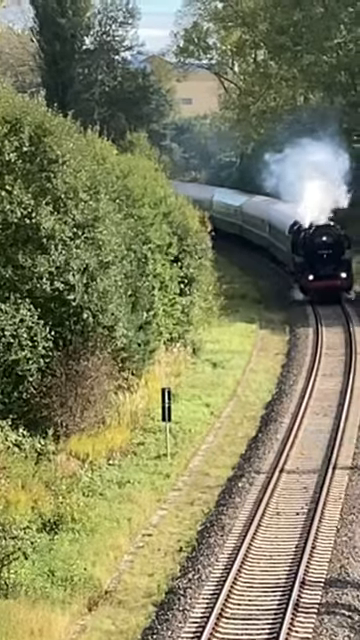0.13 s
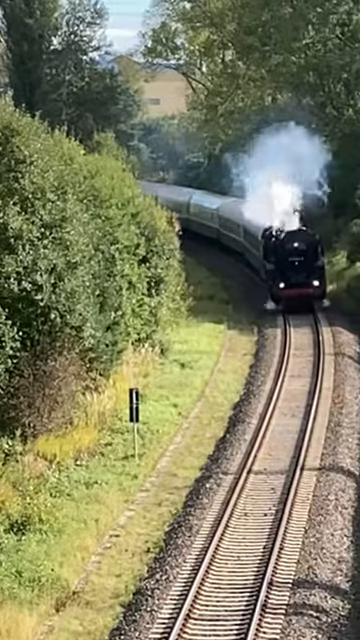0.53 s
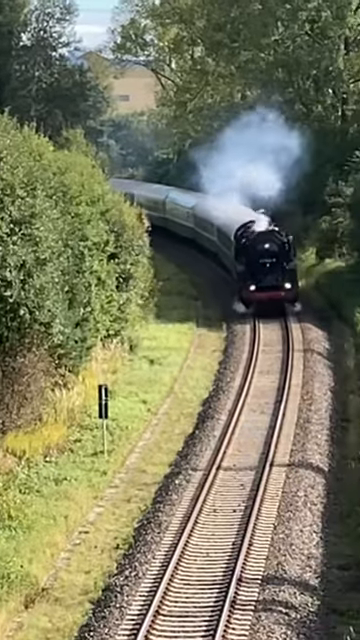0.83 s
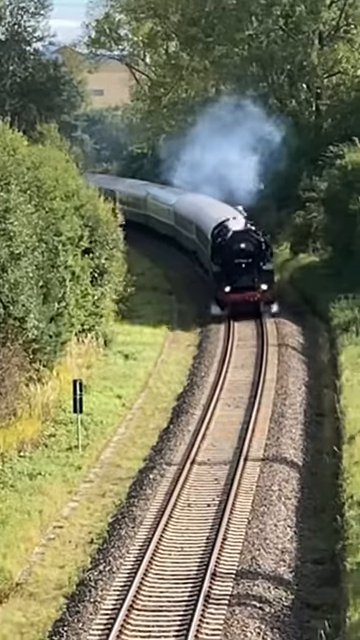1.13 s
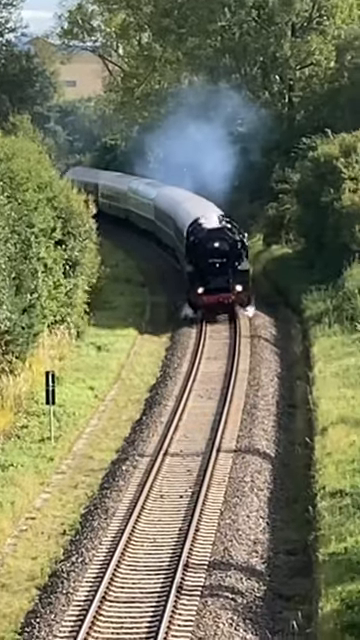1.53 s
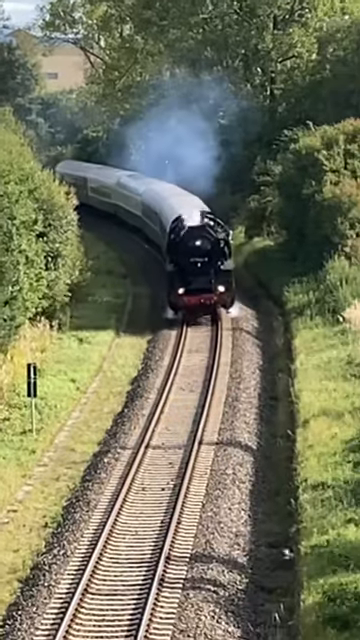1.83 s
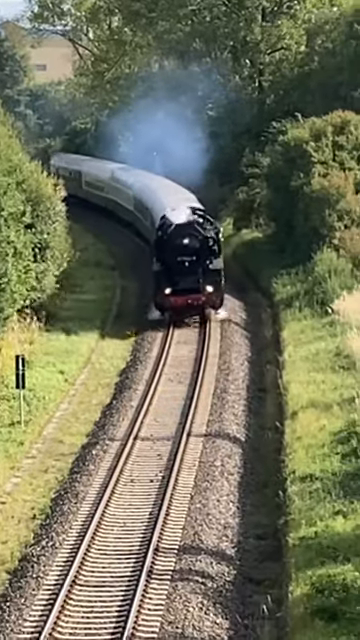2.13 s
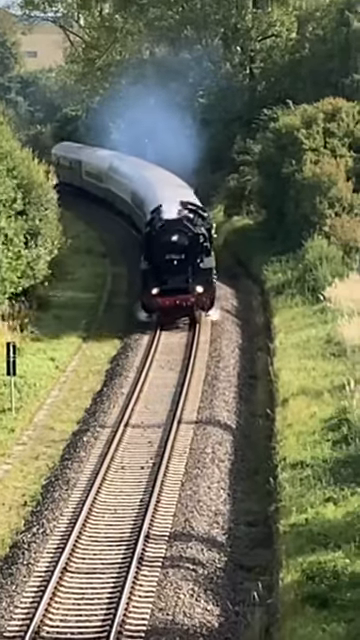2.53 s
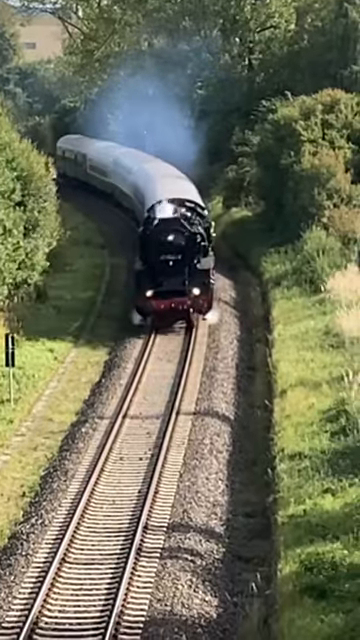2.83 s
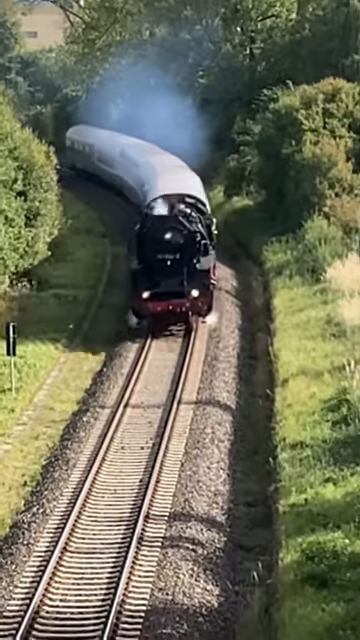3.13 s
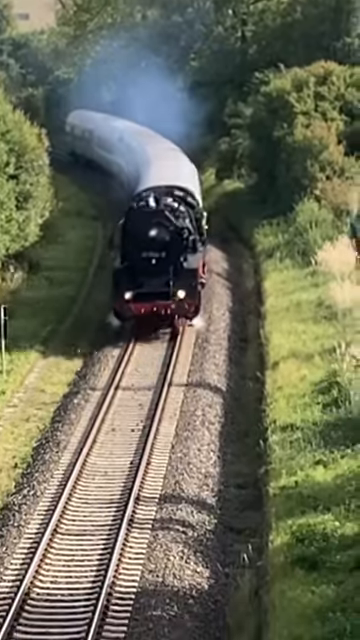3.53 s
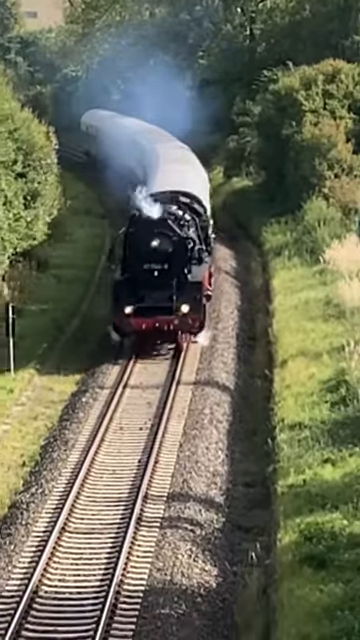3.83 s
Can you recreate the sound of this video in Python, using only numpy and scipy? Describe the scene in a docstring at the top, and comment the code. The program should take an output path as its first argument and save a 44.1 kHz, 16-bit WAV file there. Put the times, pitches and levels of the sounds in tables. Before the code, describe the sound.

Steam locomotive whistle wavers breathily, cuts off and echoes among trees as the train rumbles closer

```python
"""A steam locomotive's whistle ends its blast: a wavering pipe tone with overtones, inside a pulsing steam jet.
Surrounding trees answer with a diffuse, decaying return of tone and hiss, built by convolution with shaped noise.
The train nears on a curve: filtered noise makes rumble, rail drone, rolling and wheel groans, and short cosine
bursts in bell-shaped envelopes make thuds and hollow knocks. Cylinder steam grows late, with one faint tick."""
import sys
import numpy as np
from scipy import signal
from scipy.fft import rfft, irfft, next_fast_len
from scipy.io import wavfile
from scipy.ndimage import uniform_filter1d, map_coordinates

SR = 44100
rng = np.random.default_rng(int(sys.argv[2]) if len(sys.argv) > 2 else 0)


def int16_out(signal):
    """Quantize to a 16-bit WAV file."""
    q = np.round(np.clip(np.atleast_2d(signal).T, -1, 1) * 32767)
    wavfile.write(sys.argv[1], SR, q.astype(np.int16))


def decibels_to_gain(level_db):
    """Convert a level in decibels to a linear amplitude gain (20 dB per decade)."""
    exponent = np.asarray(level_db, float) / 20
    return 10 ** exponent


N = 176400
TIME = np.arange(N) / SR  # s

# Whistle fundamental: (time [s], pitch [Hz], level [dB])
WHISTLE_TONE = [(0.0, 445.4, -24.5), (0.052, 450.3, -12.5), (0.218, 450, -12.5), (0.3, 448, -18.5),
                (0.358, 445.9, -26.5), (0.41, 454.6, -17), (0.456, 447.5, -24), (0.478, 441.3, -29),
                (0.525, 437.4, -18.5), (0.57, 436, -25.5), (0.612, 438.7, -18), (0.65, 443, -36),
                (0.675, 444, -27.5), (0.742, 455, -23.5), (0.765, 454.4, -14), (0.862, 455.7, -21),
                (0.904, 450.5, -13), (0.95, 446.2, -31), (0.994, 455.2, -16), (1.028, 433.3, -31.5),
                (1.05, 428, -25), (1.105, 427, -22), (1.124, 450, -39.5), (1.142, 439.5, -29.5),
                (1.2, 434, -49.5)]
# Octave, which leads the overtones: (time [s], frequency [Hz], level [dB])
WHISTLE_OCTAVE = [(0, 900, -36), (.11, 903, -32), (.3, 902, -39), (.42, 900, -35), (.48, 885, -34),
                  (.57, 879, -34), (.65, 884, -43), (.72, 898, -36), (.81, 915, -35), (.97, 912, -36),
                  (1.08, 913, -38), (1.15, 905, -55)]
# Overtones: (multiple of the pitch [1], level re octave [dB])
WHISTLE_OVERTONES = [(2, 0.5), (3, -6.5), (4, -9.5), (5.05, -29.5)]
# High modes of the bell, a little sharp: (multiple of the pitch [1], level re jet at its strongest [dB])
BELL_MODES = [(7.17, -12.5), (8.2, -18), (9.12, -9), (10.16, -9), (11.17, -10)]
# Steam jet of the whistle: (time [s], level [dB])
JET_LEVEL = [(0, -39.5), (.2, -36.5), (.45, -38), (.6, -44.5), (.72, -35.5), (.8, -34), (.89, -30.5),
             (.96, -39), (1.05, -71.5), (1.15, -72.5)]
# Jet spectrum: (frequency [Hz], relative density [dB])
JET_SPECTRUM = [(250, -50), (380, 11.5), (450, 12), (540, 1), (700, 3.5), (1000, -2), (1400, 4.5),
                (1900, 4.5), (2600, -4), (3300, -4), (3700, -3.5), (4200, -1), (5100, -12.5), (5700, -12.5),
                (7200, -12.5), (8300, -17.5), (10000, -42)]
# Reverberation of the trees: (frequency [Hz], 60 dB decay time [s])
TREE_DECAY = [(300, 3.4), (1000, 2.4), (5200, 1.1), (8000, 0.19)]
# Far tree line: (delay [s], spread [s], level at the pitch [dB])
TREE_LINES = [(0.68, 0.11, -17.5)]
# Ground rumble of the nearing train: (time [s], level [dB])
RUMBLE_LEVEL = [(0.0, -38.5), (0.91, -40.5), (1.22, -39.5), (2.23, -37.5), (3.29, -30.5), (4.0, -33)]
# Rumble spectrum: (frequency [Hz], relative density [dB])
RUMBLE_SPECTRUM = [(13, -47), (22, -20.5), (54, 6), (70, 1), (108, -2.5), (150, 0), (200, -27.5),
                   (330, -120)]
# Rail drone: (time [s], level [dB])
DRONE_LEVEL = [(0.0, -37), (0.23, -40), (3.16, -32.5), (4.0, -39)]
# Drone spectrum: (frequency [Hz], relative density [dB])
DRONE_SPECTRUM = [(130, -43), (160, -10.5), (190, 2), (212, -5.5), (245, -10.5), (275, -21.5), (340, -23),
                  (420, -60.5)]
# Rolling noise: (time [s], level [dB])
ROLLING_LEVEL = [(0, -36.5), (1.7, -46.5), (2.3, -45.5), (2.7, -43), (3.6, -40), (4, -39.5)]
# Rolling spectrum: (frequency [Hz], relative density [dB])
ROLLING_SPECTRUM = [(200, -41.5), (260, -10), (310, -10), (480, -1.5), (680, -8.5), (860, -17), (1050, -14),
                    (1650, -13), (1850, -21.5), (3000, -29), (5000, -37.5), (6500, -79)]
# Wheels groaning on the curve: (time [s], half length [s], level [dB])
WHEEL_GROANS = [(1.438, .06, -46), (2.702, 0.072, -40.5), (3.034, 0.04, -50), (3.213, 0.031, -46.5),
                (3.397, 0.048, -41), (3.586, 0.064, -34.5), (3.826, 0.055, -38.5)]
# Groan spectrum: (frequency [Hz], relative density [dB])
GROAN_SPECTRUM = [(330, -78), (440, -11.5), (520, 0), (620, -0.5), (720, -15.5), (900, -60)]
# Low thuds: (time of zero phase [s], peak of the envelope [dB], frequency [Hz])
LOW_THUDS = [(2.271, -33, 61.2), (2.789, -24, 83), (2.949, -21.5, 56.2), (3.098, -21, 55.2),
             (3.259, -29, 49.5), (3.548, -31, 61), (3.717, -27.5, 59), (3.899, -21.5, 57.3)]
# Hollow knocks in the drone: (time of zero phase [s], peak of the envelope [dB], frequency [Hz])
HOLLOW_KNOCKS = [(1.47, -25, 192.1), (2.318, -23.5, 205.7), (2.384, -25, 172.3), (2.458, -28, 196),
                 (2.556, -22, 196), (2.605, -19.5, 183), (2.68, -21, 187.6), (2.787, -22.5, 181.4),
                 (3, -23.5, 197.4), (3.08, -39, 195), (3.17, -29.5, 179), (3.252, -25.5, 153),
                 (3.432, -37, 189), (3.498, -26.5, 190.4)]
# Cylinder steam: (time [s], level [dB])
LEAK_LEVEL = [(0, -81), (1.9, -77.5), (2.55, -63.5), (3.0, -63), (3.5, -60.5), (3.85, -56), (4, -58)]
# Cylinder steam spectrum: (frequency [Hz], relative density [dB])
LEAK_SPECTRUM = [(1500, -36), (2500, -2.5), (3500, -5), (4700, 2.5), (5400, -13), (7300, -4.5), (8600, -17)]
# Faint tick: (time [s], level [dB])
FAINT_TICKS = [(3.815, -52.5)]
# Tick spectrum: (frequency [Hz], relative density [dB])
TICK_SPECTRUM = [(2500, -51.5), (4000, -6), (7000, 1), (9000, -20)]
# Coherence of a diffuse field at the two microphones: (frequency [Hz], left-right likeness [1])
COHERENCE = [(40, 0.95), (120, 0.95), (240, 0.99), (480, 0.72), (970, 0.47), (1500, -0.44), (2400, -0.1),
             (3900, 0.01), (6000, .4), (8000, .2)]

CLOSE_S, CLOSE_DB_PER_S = 1.15, 308.5  # the whistle valve shuts
PITCH_JITTER_HZ = 2.5
FLUTTER_HZ, FLUTTER_DEPTH = 74.48, 0.13  # unsteady jet: fast shake of the fundamental
TWINKLE_HZ, TWINKLE_DEPTH = 13, 0.65  # air shakes each overtone; rate is per multiple, depth is the octave's
TWINKLE_DEPTH_PER_MULTIPLE = 0.35  # added above the octave
WILT_S, WILT_DB_PER_S = 0.94, 52.5  # falling pressure: loss begins here, per multiple above the octave
SHAKE_HZ, SHAKE_DEPTH = 230, 4  # turns the bell modes into narrow noise
MODE_SWING_DB, MODE_GROWTH = 3, 0.25  # modes come and go; extra share of the jet's dB swing per multiple
TONE_SIDE_DB, OVERTONE_SIDE_DB, MODE_SIDE_DB = -8.5, -3.5, -2  # unequal arrival at the microphones
JET_DB, JET_PULSES = 3, 0.15  # whole jet over its treble; depth of gating once a cycle
JET_BASS_SWING = 0.23  # share of the jet's dB swings that its bass follows
TREES_DB, TONE_IN_TREES_DB = -5.5, -6.5  # diffuse tail; the trees return the tone less than the hiss
ECHO_DULLS_DB = 4.5  # loss per octave above the pitch
BLUR_HZ, BLUR_DEPTH = 32, 1.3  # moving leaves smear the returned tone
THUD_S, KNOCK_S, TICK_S = 0.01, 0.0086, 0.0045  # half lengths


def whistle():
    """Pipe resonance: an unsteady steam jet drives a fundamental, overtones and bell modes: (tone, hiss)."""
    pitch_hz, tone_db = curves(WHISTLE_TONE)
    octave_hz, octave_db = curves(WHISTLE_OCTAVE)
    jet_db, = curves(JET_LEVEL)
    shut = decibels_to_gain(-CLOSE_DB_PER_S * np.maximum(TIME - CLOSE_S, 0))
    jitter_hz = PITCH_JITTER_HZ * wobble(59.98)
    phase = 2 * np.pi * np.cumsum(pitch_hz + jitter_hz) / SR
    upper_phase = 2 * np.pi * np.cumsum(octave_hz / 2 + jitter_hz) / SR
    tone = fundamental(phase, tone_db)
    tone = tone + overtones(upper_phase, octave_db) + bell_modes(upper_phase, jet_db)
    mid, side = np.sqrt(2) * shut * tone
    return np.array([mid + side, mid - side]), shut * jet_hiss(phase, jet_db)


def fundamental(phase, tone_db):
    """Jet instability: the lowest pipe mode flutters, while its scattered part keeps a smoother level."""
    steady_db = uniform_filter1d(tone_db, size=SR // 8)
    gains = mid_and_side(FLUTTER_DEPTH, FLUTTER_HZ, TONE_SIDE_DB)
    return decibels_to_gain([tone_db, steady_db]) * np.imag(gains * np.exp(1j * phase))


def overtones(phase, octave_db):
    """Modal excitation: as pressure falls, higher pipe modes fail first; they also shake faster and deeper."""
    wilt_db = WILT_DB_PER_S * np.maximum(TIME - WILT_S, 0)
    total = 0
    for multiple, db in WHISTLE_OVERTONES:
        above = multiple - 2
        depth = TWINKLE_DEPTH + TWINKLE_DEPTH_PER_MULTIPLE * above
        gains = mid_and_side(depth, TWINKLE_HZ * multiple, OVERTONE_SIDE_DB)
        level = decibels_to_gain(octave_db + db - above * wilt_db)
        total = total + level * np.imag(gains * np.exp(1j * multiple * phase))
    return total


def bell_modes(phase, jet_db):
    """Modal excitation: high modes are narrow noise bands that need a stronger jet the higher they lie."""
    total = 0
    for multiple, db in BELL_MODES:
        growth = MODE_GROWTH * (multiple - BELL_MODES[0][0])
        level_db = jet_db + db + growth * (jet_db - jet_db.max()) + MODE_SWING_DB * wobble(13.98)
        gains = mid_and_side(SHAKE_DEPTH, SHAKE_HZ, MODE_SIDE_DB)
        total = total + decibels_to_gain(level_db) * np.imag(gains * np.exp(1j * multiple * phase))
    return total


def jet_hiss(phase, jet_db):
    """Turbulence: broadband jet noise is modulated once per cycle of the tone, its bass swinging less."""
    noise = rush(JET_SPECTRUM, patchy_db=3.5)
    bass = filtered(noise, lambda hz: 1 / (1 + (hz / 2200) ** 4))
    bass_gain = decibels_to_gain((JET_BASS_SWING - 1) * (jet_db - jet_db[0]))
    pulses = 1 + JET_PULSES * np.sin(phase)
    return decibels_to_gain(jet_db + JET_DB) * pulses * (noise - bass + bass * bass_gain)


def mid_and_side(depth, rate_hz, side_db):
    """Scattering: complex gains of the common tone and of the part reaching the microphones unequally."""
    side = 1j * decibels_to_gain(side_db) * shake(0.76, 8.9) * shake(depth, rate_hz)
    return np.array([shake(depth, rate_hz), side])


def trees(tone, hiss):
    """Diffuse reverberation: decay depends on frequency, and a far tree line adds a later cluster."""
    smeared = np.real(signal.hilbert(tone.mean(0)) * shake(BLUR_DEPTH, BLUR_HZ))
    source = decibels_to_gain(TONE_IN_TREES_DB) * smeared + hiss[0]
    hz, t, noise = signal.stft(rng.standard_normal((2, 2 * SR)), SR, nperseg=256)
    octaves_up = np.log2(np.maximum(hz / WHISTLE_TONE[1][1], 1))[:, None]
    decay = decibels_to_gain(-60 * t / along(TREE_DECAY, hz)[:, None])
    shape = decibels_to_gain(TREES_DB) * unit_energy(decay)
    for delay, spread_s, db in TREE_LINES:
        cluster = unit_energy(np.exp(-((t - delay) / spread_s) ** 2))
        shape = shape + decibels_to_gain(db - ECHO_DULLS_DB * octaves_up) * cluster
    flat = signal.istft(noise, SR, nperseg=256)[1]
    tail = signal.istft(noise * shape, SR, nperseg=256)[1]
    tail = tail * np.sqrt(len(t)) / np.linalg.norm(flat[0])
    # The blast began earlier: its mirrored opening excites the trees beforehand
    earlier = np.pad(source, (SR // 2, 0), "reflect")
    answer = signal.fftconvolve(earlier[None], tail, axes=1)
    return spread(answer[:, SR // 2:][:, :N])


def train():
    """Rolling contact: rough noise bands of ground, rail and wheels combine with short tonal blows."""
    rumble = decibels_to_gain(curves(RUMBLE_LEVEL)[0] + 1.7 * wobble(9.7)) * rush(RUMBLE_SPECTRUM, patchy_db=2.0)
    drone = decibels_to_gain(curves(DRONE_LEVEL)[0] + 0.26 * wobble(16)) * rush(DRONE_SPECTRUM, patchy_db=0.17)
    rolling = decibels_to_gain(curves(ROLLING_LEVEL)[0] + 0.8 * wobble(10)) * rush(ROLLING_SPECTRUM, patchy_db=1.7)
    blows_sum = blows(LOW_THUDS, THUD_S) + blows(HOLLOW_KNOCKS, KNOCK_S)
    return rumble + drone + rolling + wheel_groans() + blows_sum


def wheel_groans():
    """Curve friction: brief swells of mid-band noise from the wheels."""
    swells = sum(decibels_to_gain(db) * bump(s, half_s) for s, half_s, db in WHEEL_GROANS)
    return swells * rush(GROAN_SPECTRUM, patchy_db=1.0)


def blows(rows, half_s):
    """Tone burst: each blow is a cosine in a bell-shaped envelope peaking 8.9 ms after zero phase."""
    total = 0
    for s, db, hz in rows:
        total = total + decibels_to_gain(db) * bump(s + 0.0089, half_s) * np.cos(2 * np.pi * hz * (TIME - s))
    return total


def cylinder_steam():
    """Turbulent outflow: leaking steam is patchy noise with slow and quicker wandering of its level."""
    level_db = curves(LEAK_LEVEL)[0] + 0.61 * wobble(3.9) + 0.84 * wobble(8.9)
    return decibels_to_gain(level_db) * rush(LEAK_SPECTRUM, patchy_db=5.7)


def ticks():
    """Band-limited transient: a short soft puff of bright noise."""
    puffs = sum(decibels_to_gain(db) * bump(s, TICK_S) for s, db in FAINT_TICKS)
    return puffs * rush(TICK_SPECTRUM, patchy_db=0)


def rush(spectrum, patchy_db):
    """Turbulent noise: a diffuse field of rms 1 with random gain patches in time and frequency."""
    noise = signal.stft(rng.standard_normal((2, N + SR // 10)), nperseg=512)[2]
    patches = uniform_filter1d(rng.standard_normal(noise.shape[1:]), size=5, axis=0)
    patches = unit(uniform_filter1d(patches, size=10, axis=1))
    pair = signal.istft(noise * decibels_to_gain(patchy_db * patches), nperseg=512)[1][:, :N]
    return unit(spread(filtered(pair, lambda hz: decibels_to_gain(along(spectrum, hz)))))


def spread(pair):
    """Spatial coherence: two unrelated signals become a diffuse field heard by two microphones."""
    def mid_side_gains(hz):
        """Coherence as an angle: mid and side gains of constant total power."""
        angle = np.arccos(np.clip(along(COHERENCE, hz), -1, 1)) / 2
        return np.array([np.cos(angle), np.sin(angle)])
    mid, side = filtered(pair, mid_side_gains)
    return np.array([mid + side, mid - side])


def shake(depth, rate_hz):
    """Random modulation: a complex gain that wanders in size and phase about a real mean."""
    wander = wobble(rate_hz) + 1j * wobble(rate_hz)
    return (1 + depth * wander) / np.sqrt(1 + 2 * depth ** 2)


def wobble(rate_hz):
    """Band-limited fluctuation: a smooth curve through rate_hz random values a second."""
    return map_coordinates(rng.standard_normal(2000), [TIME * rate_hz])


def bump(s, half_s):
    """Gaussian pulse: a bell-shaped envelope in time."""
    return np.exp(-((TIME - s) / half_s) ** 2 / 2)


def filtered(x, response):
    """Linear filtering: the spectrum of x times a response of frequency."""
    m = next_fast_len(N + 8192)
    return irfft(rfft(x, m) * response(np.fft.rfftfreq(m, 1 / SR)), m)[..., :N]


def along(points, hz):
    """Logarithmic pitch scale: (frequency [Hz], value) points interpolated on a log axis."""
    f, value = np.transpose(points)
    return np.interp(np.log(hz + 1), np.log(f + 1), value)


def curves(rows):
    """Linear interpolation: one value per sample for each column after the time."""
    s, *columns = np.transpose(rows)
    return [np.interp(TIME, s, column) for column in columns]


def unit(x):
    """Power normalisation: x scaled to rms 1."""
    return x / np.sqrt(np.mean(x ** 2) + 1e-20)


def unit_energy(x):
    """Energy normalisation: x scaled to a sum of squares of 1 along time."""
    return x / np.linalg.norm(x, axis=-1, keepdims=True)


def scene():
    """Superposition: whistle, trees, train, cylinder steam and a tick add linearly."""
    tone, hiss = whistle()
    return tone + hiss + trees(tone, hiss) + train() + cylinder_steam() + ticks()


def band_limit(x):
    """A steep low-pass at the top of the band."""
    return signal.sosfilt(signal.butter(12, 8360, fs=SR, output="sos"), x)


def record(dry):
    """Final stage: the summed field of all sources becomes the two-channel output."""
    return band_limit(dry)


dry = scene()
out = record(dry)
int16_out(out)
```